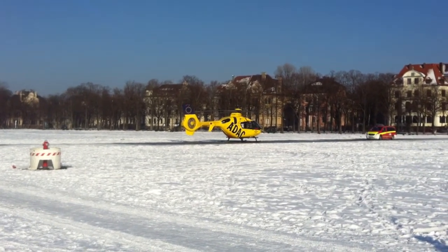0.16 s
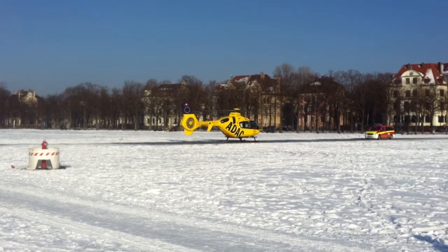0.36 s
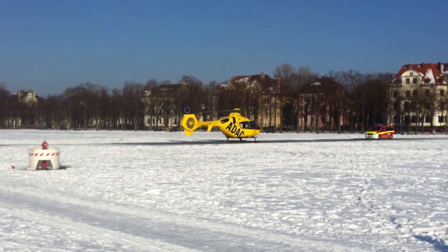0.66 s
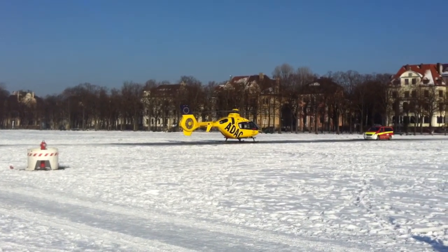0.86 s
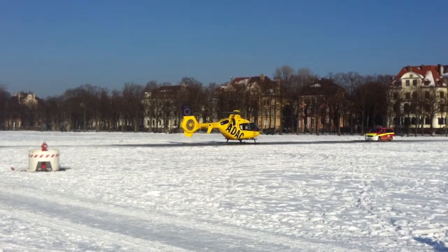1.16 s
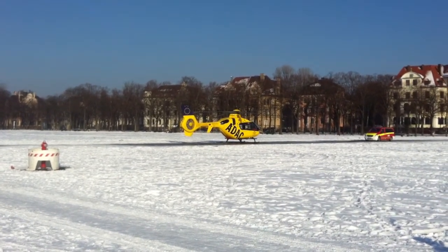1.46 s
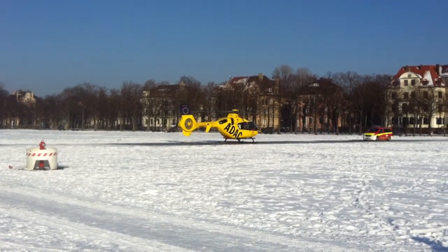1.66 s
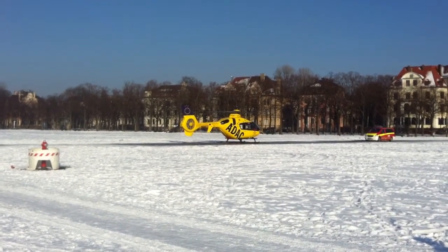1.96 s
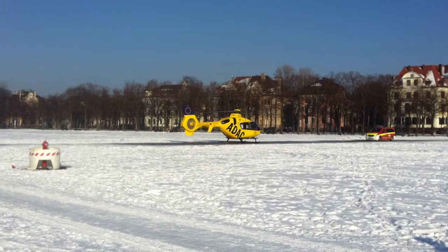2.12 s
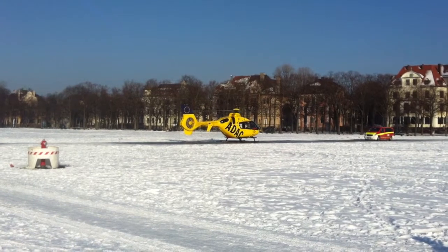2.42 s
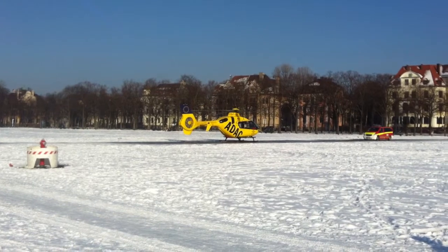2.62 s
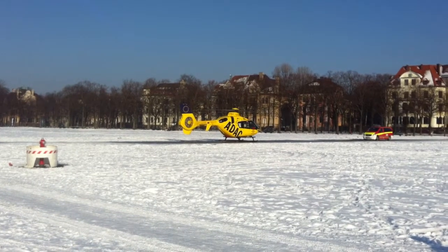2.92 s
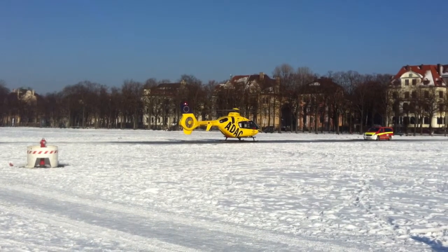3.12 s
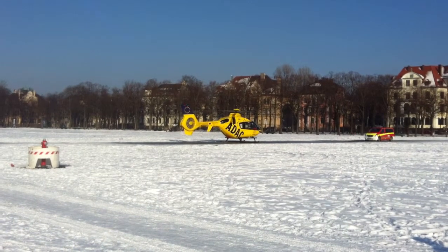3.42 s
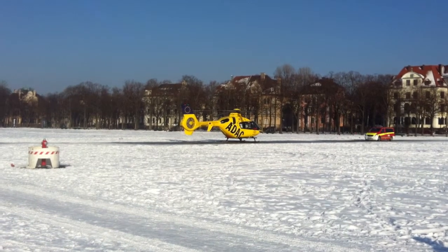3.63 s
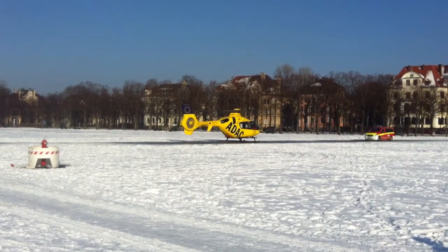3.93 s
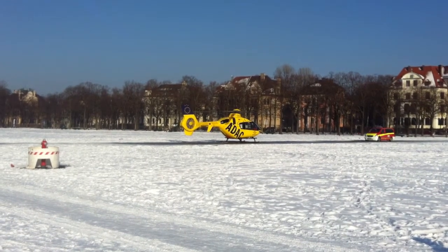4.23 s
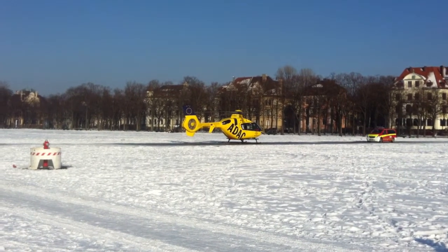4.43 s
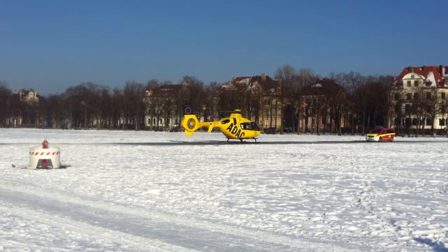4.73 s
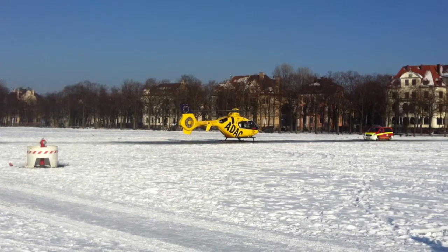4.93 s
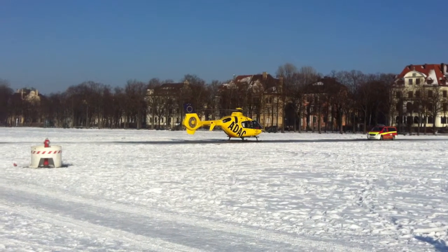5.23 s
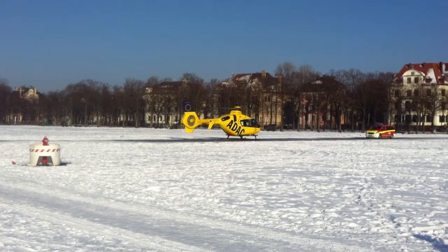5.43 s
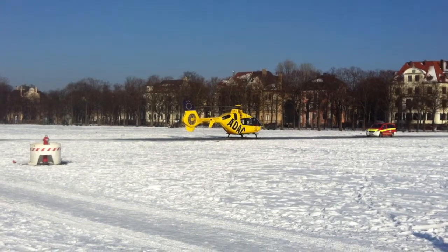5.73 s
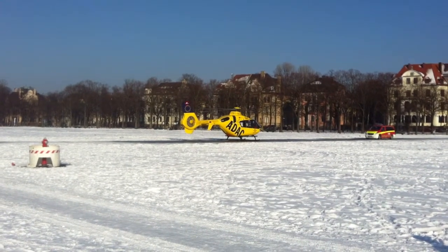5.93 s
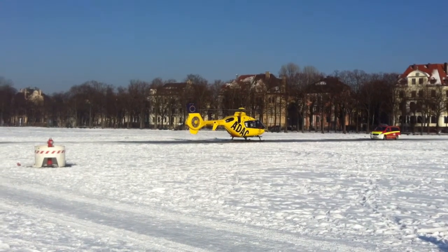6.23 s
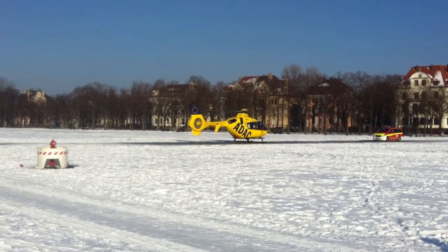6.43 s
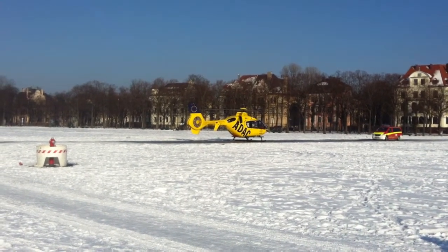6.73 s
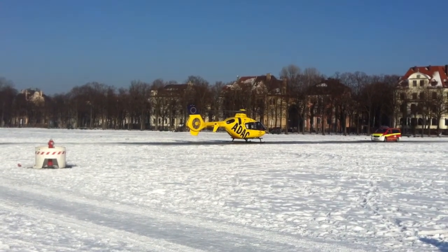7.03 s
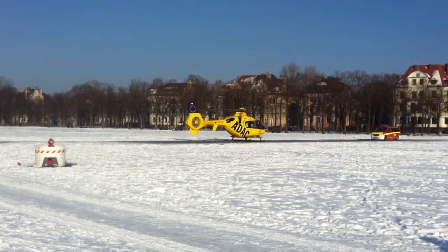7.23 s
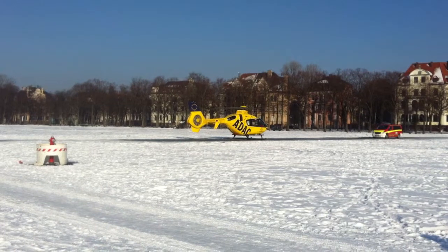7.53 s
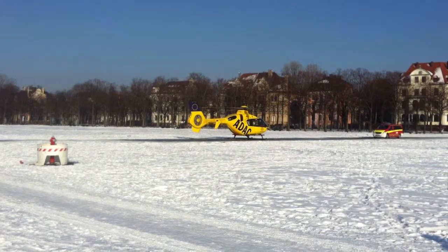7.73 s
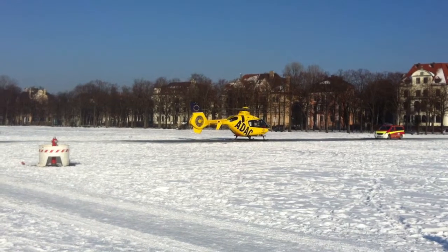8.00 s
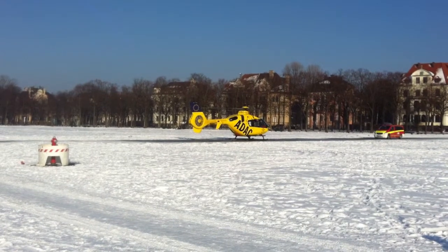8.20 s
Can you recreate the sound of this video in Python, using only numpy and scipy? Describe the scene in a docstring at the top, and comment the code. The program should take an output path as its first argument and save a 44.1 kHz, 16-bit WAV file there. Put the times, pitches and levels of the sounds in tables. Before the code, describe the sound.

Across a snow-covered field, a distant helicopter's turbines spool up with a broad, rushing roar that gradually builds. A faint high whine wavers in and out above the intake hiss, rising slowly at first and then faster. From a little past halfway, wind buffets the microphone in irregular low thumps while the engines keep roaring.

```python
"""Helicopter run-up on a snow field

A distant helicopter runs up its turbines; the shaft speeds up steadily, then faster.
Turbulence drives broad exhaust resonances, a roar that brightens with power; the intake hisses,
and the compressor's thin blade-passing tones climb. Moving air makes the treble swell and fade,
and in the second half gusts thump on the microphone."""
import sys
import numpy as np
from scipy import signal
from scipy.fft import rfft, irfft, next_fast_len
from scipy.io import wavfile

SR = 44100
rng = np.random.default_rng(int(sys.argv[2]) if len(sys.argv) > 2 else 0)


def generate_wav(sig):
    """Save sig (samples, or channels by samples) to the path in sys.argv[1] as 16-bit PCM at SR."""
    pcm = np.round(np.clip(np.atleast_2d(sig).T, -1, 1) * 32767).astype(np.int16)
    wavfile.write(sys.argv[1], SR, pcm)


N = 368676


def from_db(db):
    """Amplitude ratio of a level in decibels."""
    return 10 ** (np.asarray(db) / 20)


def unit_rms(x):
    """Normalisation to unit mean power."""
    return x / np.sqrt(np.mean(x ** 2) + 1e-20)


def deviation(curve):
    """Deviation of a curve from its mean."""
    return curve - curve.mean()


def in_time(rows):
    """Linear interpolation of each column of a time table to every sample."""
    times, *columns = np.transpose(rows)
    return [np.interp(np.arange(N) / SR, times, column) for column in columns]


def noise(gain_at):
    """Spectral shaping: white noise weighted by a gain at each frequency; rms 1."""
    size = next_fast_len(N, True)
    hz = np.maximum(np.arange(size // 2 + 1) * SR / size, 1e-3)
    spectrum = rfft(rng.standard_normal(size)) * gain_at(hz)
    return unit_rms(irfft(spectrum, size)[:N])


def drift(rate_hz):
    """Smooth random fluctuation: noise low-passed at rate_hz; rms 1."""
    return noise(lambda hz: 1 / (1 + (hz / rate_hz) ** 4))


def flutter(depth_db, rate_hz):
    """Random fading: the fluctuating gain that uneven air imposes on a sound."""
    return from_db(depth_db * drift(rate_hz))


def turbulence(spectrum):
    """Turbulence radiates a continuous spectrum, here interpolated over log frequency."""
    points_hz, db = np.transpose(spectrum)
    return noise(lambda hz: from_db(np.interp(np.log(hz), np.log(points_hz), db)))


def resonances(modes):
    """Forced resonance: turbulence excites steep-sided modes whose powers add."""
    def gain_at(hz):
        power = 0
        for centre, width, db in modes:
            detuning = (hz - centre ** 2 / hz) / (2 * width)
            power += (from_db(db) / (1 + 2 * detuning ** 2)) ** 2
        return np.sqrt(power)
    return noise(gain_at)


def open_field(level_db=-78):
    """Ambient noise: the faint, steady broadband sound of open country."""
    # ambient spectrum (frequency [Hz], level [dB])
    spectrum = [(20, -4), (50, -29), (90, -6), (300, 20), (1000, 12), (4000, -18)]
    return from_db(level_db) * turbulence(spectrum)


def wind(eddy_db=-0.5, thump_db=2.0, rise_cycles=0.352, decay_cycles=0.4, low_cut_hz=95):
    """Flow pressure on the microphone: eddies follow the breeze; a hard gust is a brief damped swing."""
    # strength of the breeze (time [s], level [dB])
    breeze = [(4.5, -80), (4.72, -72), (4.78, -41), (5.0, -37), (5.11, -55), (5.18, -31), (5.27, -55),
              (5.37, -33), (5.5, -50), (5.67, -36), (6.12, -52.5), (6.39, -39), (6.55, -56), (7.2, -42),
              (7.36, -70), (8.18, -58), (8.29, -39.5), (8.36, -48)]
    # eddy spectrum (frequency [Hz], level [dB])
    eddies = [(20, -26), (50, -19), (90, -8), (140, 2.5), (250, -1.5), (400, -5.5), (700, -37), (2000, -70)]
    # hardest gusts (time [s], relative peak level [dB], frequency [Hz])
    thumps = [(4.774, -23.5, 208), (4.833, -31, 195), (5.179, -20, 272), (5.213, -21, 213),
              (5.340, -13, 260), (5.403, -29, 148.6), (5.548, -26, 200), (5.564, -26, 177),
              (5.621, -25, 173), (5.718, -26, 158), (5.817, -22, 192), (5.960, -20, 296),
              (5.986, -21.5, 190), (6.376, -19, 240), (7.02, -27, 273), (7.145, -25, 180), (7.17, -24, 195),
              (7.206, -13.5, 206), (7.262, -26, 172), (8.308, -27, 231.4)]
    breeze_level, = in_time(breeze)
    pressure = from_db(eddy_db + breeze_level) * turbulence(eddies) * flutter(depth_db=4.5, rate_hz=53)
    for (time, db, hz), start_turn in zip(thumps, rng.random(len(thumps))):
        span = np.arange(max(int((time - .03) * SR), 0), min(int((time + .05) * SR), N))
        age_cycles = (span / SR - time) * hz
        envelope = 1 / np.cosh(age_cycles / np.where(age_cycles < 0, rise_cycles, decay_cycles))
        # the lows lag, so the swing slows as it dies
        turns = start_turn + np.cumsum(hz * (1 - 0.436 * np.tanh(age_cycles / 2))) / SR
        pressure[span] += from_db(db + thump_db) * envelope * np.sin(2 * np.pi * turns)
    # a small microphone passes little deep bass
    return signal.sosfilt(signal.butter(2, low_cut_hz, "high", fs=SR, output="sos"), pressure)


def intake(whine_hz, hiss_db=-3.0, sizzle_db=-53.5, sizzle_share=0.67, sizzle_db_per_octave=6.5):
    """Flow noise: air tearing through the intakes hisses, and its top sizzle grows with shaft speed."""
    # swell and fade of the hiss on its way through the air (time [s], level [dB])
    transmission = [(0.0, -44), (1.07, -39.5), (1.83, -40), (2.3, -43), (2.6, -39.6), (3.6, -39.5),
                    (4.1, -40.0), (4.4, -36.5), (4.8, -40.5), (5.53, -35.5), (5.93, -38), (6.23, -37.4),
                    (6.4, -34), (6.83, -37.5), (7.03, -35.8), (7.33, -38), (7.93, -35.1), (8.33, -35)]
    # spectra of the hiss and the sizzle (frequency [Hz], level [dB])
    hiss_spectrum = [(3000, -44), (3900, -16), (4400, -11), (4700, -2), (5200, -2.5), (5800, 2),
                     (6300, 3.5), (6750, -0.5), (7150, -7), (7750, -19), (8700, -23), (11000, -42)]
    sizzle_spectrum = [(7000, -25), (8200, -4.5), (8800, 0), (9800, 0.5), (10700, -4), (11600, -5),
                       (12400, -29), (13400, -25), (14300, -10), (15700, -12)]
    level, = in_time(transmission)
    hiss = from_db(hiss_db + level) * turbulence(hiss_spectrum) * flutter(depth_db=0.8, rate_hz=12)
    shaft_octaves = deviation(np.log2(whine_hz))
    sizzle_level = sizzle_db + sizzle_share * deviation(level) + sizzle_db_per_octave * shaft_octaves
    sizzle = from_db(sizzle_level) * turbulence(sizzle_spectrum) * flutter(depth_db=0.7, rate_hz=19)
    return hiss + sizzle


def spool_up(start_hz=7910, slow_hz_per_s=443, fast_hz_per_s=738, faster_at_s=3.95, ease_s=.4):
    """Blade-passing frequency [Hz] follows shaft speed: a steady climb eases into a faster one."""
    t = np.arange(N) / SR
    time_fast = ease_s * np.logaddexp(0, (t - faster_at_s) / ease_s)
    return start_hz + slow_hz_per_s * t + (fast_hz_per_s - slow_hz_per_s) * time_fast


def blade_tone(pitch_hz, level_db, halo_db, flare_db, scatter=0.5, wobble_hz=5, halo_hz=60, flare_hz=700):
    """Scattering makes a tone twinkle; turbulence broadens it into a narrow halo and a wide flare."""
    def sidebands(hz):
        halo = from_db(halo_db) / (1 + (hz / halo_hz) ** 4) / np.sqrt(halo_hz)
        flare = from_db(flare_db) / (1 + (hz / flare_hz) ** 2) / np.sqrt(flare_hz)
        return halo + flare
    phase = 2 * np.pi * np.cumsum(pitch_hz + wobble_hz * drift(7.3)) / SR
    haze = np.hypot(from_db(halo_db), from_db(flare_db)) * (noise(sidebands) + 1j * noise(sidebands))
    rays = 1 + scatter * (drift(9.7) + 1j * drift(11)) + haze
    return from_db(level_db) * unit_rms(np.real(rays * np.exp(1j * phase)))


def compressor(whine_hz, upper_ratio=1.5, upper_db=-71.0, upper_share=0.57, side_ratio=1.068, side_db=1):
    """Blade passage: three tones climb in fixed ratio; the top one swells with the whine and wavers."""
    # main whine (time [s], level [dB])
    whine_curve = [(1.1, -73), (1.53, -57), (2.4, -62), (2.6, -53.5), (3.42, -45.5), (3.87, -55),
                   (4.13, -45), (4.27, -58), (4.43, -43), (4.95, -66), (5.3, -57), (5.48, -48), (6.5, -65),
                   (6.8, -50), (6.97, -69), (7.12, -51), (7.63, -65), (8.33, -62)]
    # hoarse side tone just above it (time [s], level [dB])
    side_curve = [(0, -61), (1.6, -55.5), (2.2, -63), (4.4, -68), (5, -90)]
    whine_level, = in_time(whine_curve)
    side_level, = in_time(side_curve)
    upper_level = upper_db + upper_share * deviation(whine_level)
    whine = blade_tone(whine_hz, whine_level, halo_db=-18, flare_db=-9.5)
    upper = blade_tone(upper_ratio * whine_hz, upper_level, halo_db=-13, flare_db=-12)
    side = blade_tone(side_ratio * whine_hz, side_db + side_level, halo_db=4, flare_db=6)
    return whine + upper * flutter(depth_db=3, rate_hz=2.8) + side


def warming(pipe_sound, rise):
    """Sound travels faster in hotter gas, so resonances creep up by the fraction rise over the run."""
    speed = 1 + rise * np.linspace(-.5, .5, N)
    return np.interp(np.cumsum(speed), np.arange(N), pipe_sound)


def exhaust(rumble_db=-49.0, rumble_share=0.47, lower_db=0.07, jet_db=-0.07, rasp_db=-0.2):
    """Flow-driven resonance: pipe roar and jet rush grow with power, combustion rumble only a little."""
    # engine power heard as roar (time [s], lower roar level [dB], upper roar level [dB])
    roar_curves = [(0.0, -34.5, -36), (2.43, -31.5, -33), (3.0, -31.3, -32.5), (3.07, -32, -35),
                   (3.4, -33.5, -33.2), (3.97, -29, -32), (4.47, -28.5, -30.8), (4.67, -29.7, -31.5),
                   (4.9, -27, -31.5), (5.1, -29, -28.2), (5.53, -26.5, -28.3), (5.83, -28.0, -27.5),
                   (6.33, -25.5, -26), (6.57, -27.5, -28.7), (7.1, -26.2, -25), (7.43, -27, -27),
                   (7.53, -26.5, -29.5), (8.33, -27, -28.0)]
    # the jet brightening with power (time [s], jet level [dB], rasp level [dB])
    jet_curves = [(0.0, -43.7, -44.5), (0.23, -46, -38.5), (0.4, -44.1, -42.5), (0.6, -42.5, -38),
                  (1.0, -40, -36.9), (1.23, -43, -39.2), (1.53, -38.7, -38), (1.87, -39.5, -36.5),
                  (2.17, -39.2, -40.5), (2.53, -40, -40.5), (2.87, -36, -37), (3.13, -39, -40),
                  (4.9, -35.5, -39.1), (5.53, -29.5, -35), (5.97, -32.4, -37.5), (6.3, -31, -35.5),
                  (8.2, -27.5, -32), (8.33, -30.5, -31)]
    # resonances of each band, low to high (centre frequency [Hz], width [Hz], level [dB])
    rumble_modes = [(161, 50, 1), (319, 44, -9.5)]
    lower_modes = [(549, 157, -7.5), (751, 132, -3), (844.5, 117, 0), (1002, 163, -6.5)]
    upper_modes = [(1332, 200, 1), (1540, 105, -5)]
    jet_modes = [(1790, 230, -7.5), (1964, 153, -1), (2195, 163, -4)]
    rasp_modes = [(2465, 310, 1.5), (2743, 270, -1), (3125, 190, -6.5)]
    lower_level, upper_level = in_time(roar_curves)
    jet_level, rasp_level = in_time(jet_curves)
    rumble = from_db(rumble_db + rumble_share * deviation(lower_level)) * resonances(rumble_modes)
    lower = from_db(lower_db + lower_level) * warming(resonances(lower_modes), rise=.07)
    upper = from_db(upper_level) * resonances(upper_modes)
    jet = from_db(jet_db + jet_level) * resonances(jet_modes)
    rasp = from_db(rasp_db + rasp_level) * resonances(rasp_modes)
    roar = (lower + upper) * flutter(depth_db=0.65, rate_hz=14)
    rush = (jet + rasp) * flutter(depth_db=0.73, rate_hz=30)
    return rumble + roar + rush


def scene():
    """Superposition of the open field, the distant turbines and the wind close by, in one channel."""
    whine_hz = spool_up()
    return (open_field() + exhaust() + intake(whine_hz) + compressor(whine_hz) + wind())[None]


def record(dry, cutoff_hz=15800):
    """Band limiting: a steep elliptic low-pass removes the highest treble."""
    return signal.sosfilt(signal.ellip(12, .1, 90, cutoff_hz, fs=SR, output="sos"), dry)


dry = scene()
out = record(dry)
generate_wav(out)
```